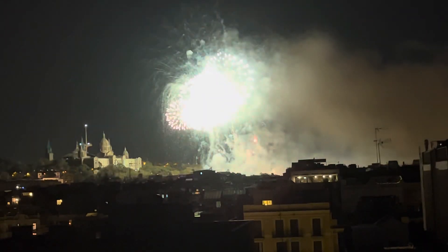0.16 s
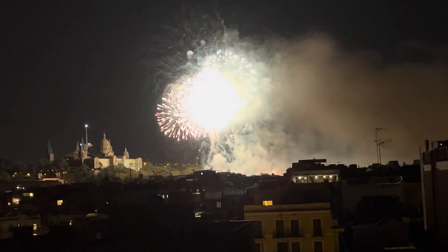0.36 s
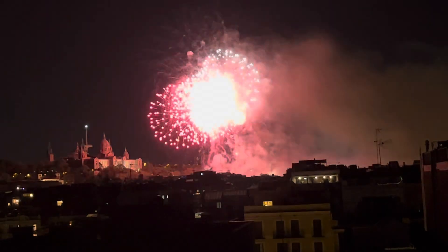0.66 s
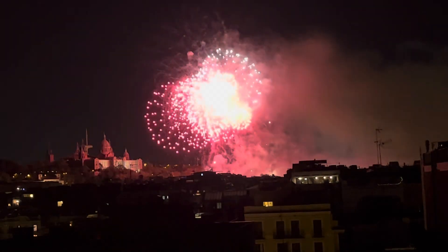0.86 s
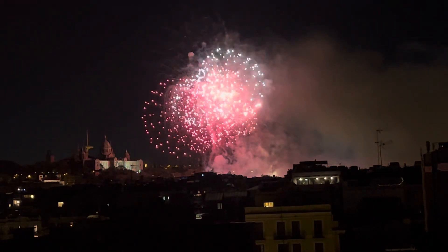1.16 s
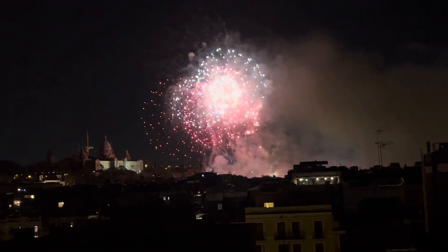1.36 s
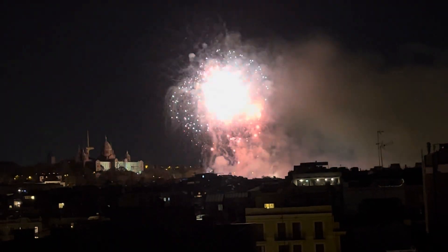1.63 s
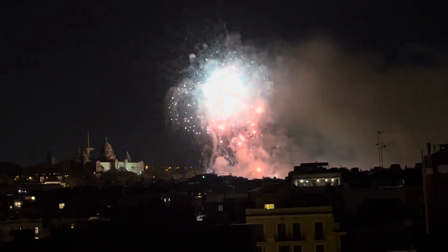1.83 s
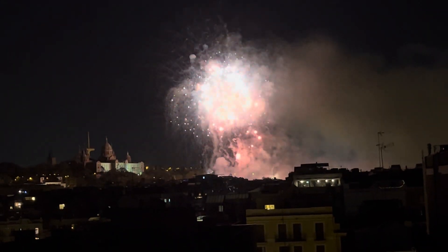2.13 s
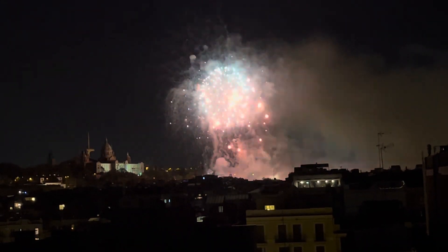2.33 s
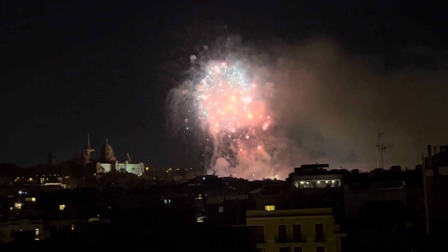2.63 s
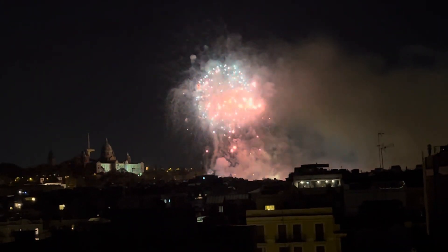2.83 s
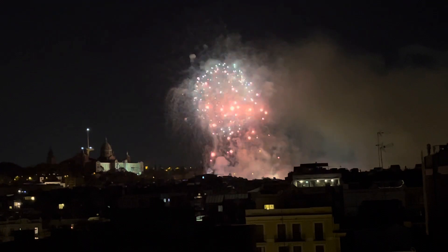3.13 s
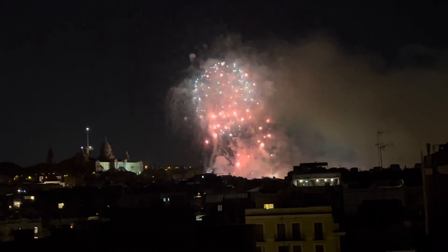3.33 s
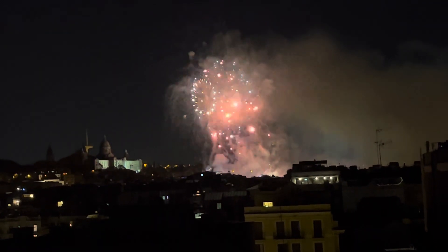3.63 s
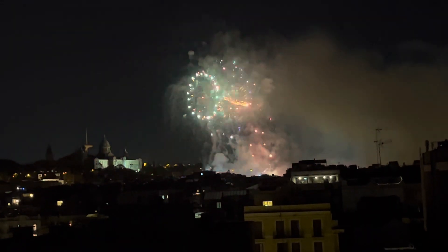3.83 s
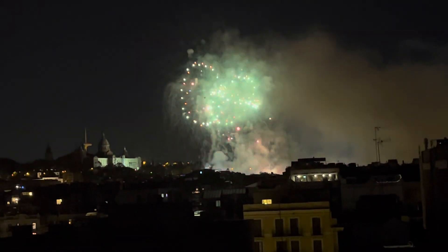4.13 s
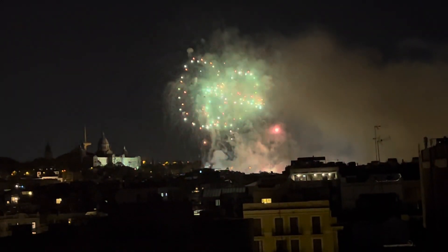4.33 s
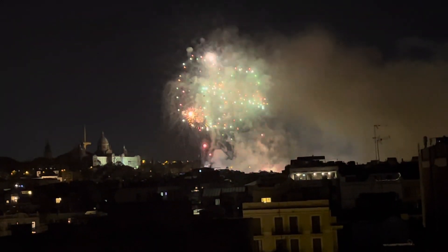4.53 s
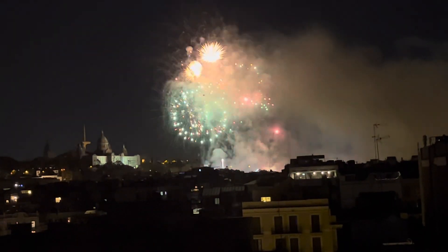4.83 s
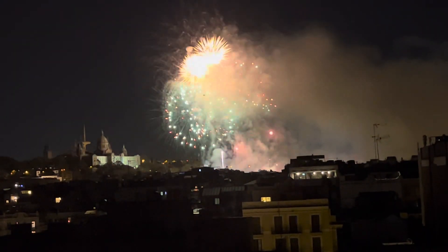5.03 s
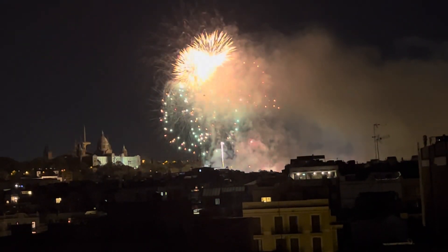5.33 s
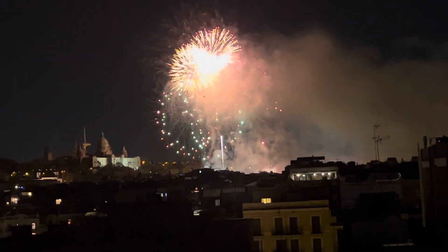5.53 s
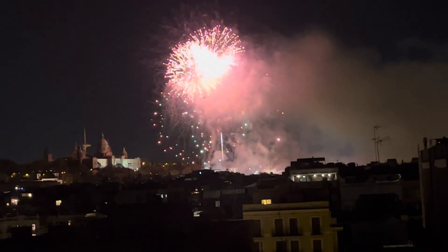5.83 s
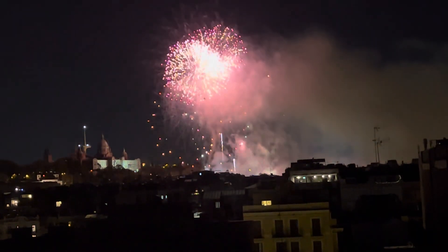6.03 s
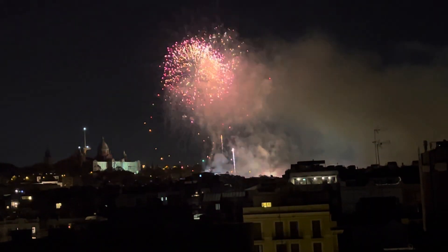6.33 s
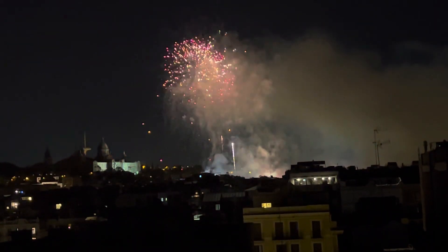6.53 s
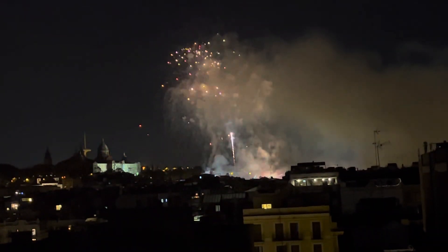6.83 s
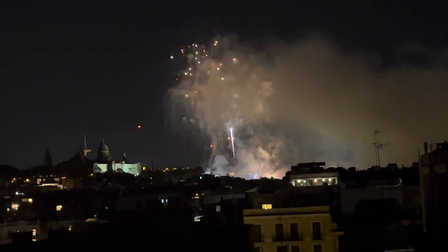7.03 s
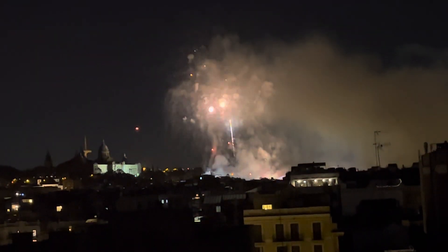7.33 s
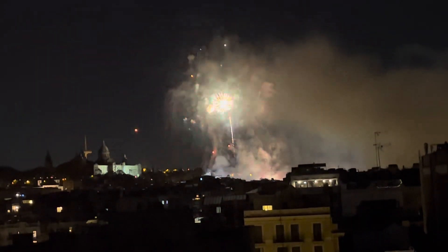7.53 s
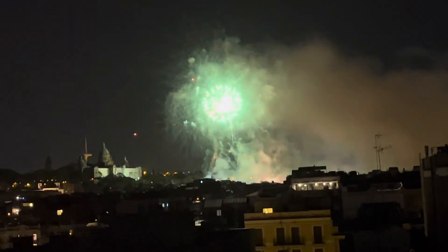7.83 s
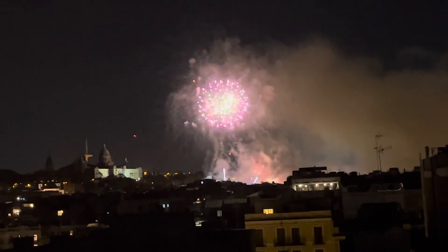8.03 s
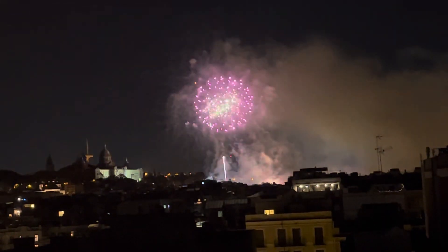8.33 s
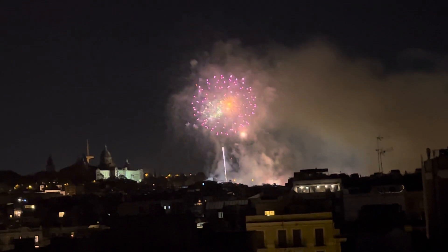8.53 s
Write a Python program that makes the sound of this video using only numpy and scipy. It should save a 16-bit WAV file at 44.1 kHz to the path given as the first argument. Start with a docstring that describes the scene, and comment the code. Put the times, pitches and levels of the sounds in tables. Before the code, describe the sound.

Far-off aerial fireworks bang sharply in clusters, echoes rumbling off hills and buildings, quiet gaps between volleys above a humming city.

```python
"""Night fireworks far off over a humming city, heard from a rooftop by a phone with two ports.
At first a volley to 1.3 s, amid the echoes of a shell that burst just before; a launch thump at 2.3 s.
Volleys at 2.8-4.9 s, thumps mainly at 6.7-7.1 s, a last volley at 7.3-8.6 s; rumble rolls throughout.
Bursts and thumps are short blast waves; their echoes are noise shaped by hills and blocks of houses.
The phone's low cut and band-splitting filters smear each blast into a falling chirp; a limiter acts."""
import sys
import numpy as np
from scipy import signal
from scipy.fft import rfft, irfft, next_fast_len
from scipy.io import wavfile
from scipy.ndimage import uniform_filter1d, minimum_filter1d

SR = 44100
rng = np.random.default_rng(int(sys.argv[2]) if len(sys.argv) > 2 else 0)


def to_wav(sig):
    """Store sig (one row per channel, or 1-D mono) as 16-bit WAV at the path in sys.argv[1].

    Samples outside -1..1 are clipped; the rate is SR.
    """
    pcm = np.clip(np.atleast_2d(sig), -1, 1) * 32767
    pcm = np.round(pcm).astype(np.int16)
    wavfile.write(sys.argv[1], SR, pcm.T)  # frames by channels


N = 381906  # samples

# shell bursts: t/s, level before air loss/dB, blast length/ms, air loss at 4 kHz/dB, echo level/dB
BURSTS = [(-0.2, 5, 1.5, 11, -22.5), (0.1145, 11, 1.3, 10.5, -30.5), (0.534, 6, 1.12, 9.5, -36),
          (0.6261, 5.5, 1.1, 8.5, -44.5), (0.6557, 4.5, 1.4, 14, -31), (1.074, 6, 1.8, 7, -26.5),
          (1.2139, 4.5, 2.9, 5.5, -22), (1.2612, 4.5, 1.7, 11.5, -29), (2.808, 9, 0.77, 18.5, -26),
          (2.9687, 5, 1.95, 9.5, -27.5), (3.9228, 10.5, 0.97, 14, -23.5), (3.9409, 5, 2.3, 6, -30),
          (3.9470, 4.5, 1.6, 7, -24.5), (4.0571, 1.5, 3, 11.5, -27.5), (4.3026, 6.5, 1, 9, -20.5),
          (4.313, 0.5, 2.2, 4.5, -31.5), (4.5697, 3, 1.4, 13.5, -30.5), (4.8533, 3.5, 1.4, 14, -40),
          (7.2633, 6.5, 2.5, 2, -17.5), (7.6831, 13.5, 1.5, 5.5, -28.5), (7.7207, 4, 2.8, 4, -23.5),
          (8.5478, 6.5, 1.1, 5.5, -23), (8.5583, -0.5, 0.91, 2.5, -40), (8.5654, -3.4, 2.2, 3, -21.5)]


def gain_of(db):
    """Amplitude factor of a level in dB."""
    return 10 ** (np.asarray(db) / 20)


def evened(x):
    """Scales to rms 1."""
    return x / np.sqrt(np.mean(x ** 2) + 1e-20)


def read(points, hz, axis=1):
    """Interpolates a table column over log frequency."""
    columns = np.transpose(points)
    return np.interp(np.log(hz + 1), np.log(columns[0] + 1), columns[axis])


def add(mix, start_s, sound):
    """Mixes in a two-channel sound, cut at the end of the mix."""
    part = mix[:, round(start_s * SR):][:, :sound.shape[1]]
    part += sound[:, :part.shape[1]]


def diffuse(colour, motion, size, patchy_db):
    """Two-port noise: fixed colour, short-time magnitude motion(hz, t) in random patches."""
    # diffuse sound at the two ports: f/Hz, left-right likeness/0-1
    port_likeness = [(60, 1), (110, 0.99), (220, 0.99), (420, 0.57), (810, 0.82), (1550, 0.26), (2970, 1),
                     (5690, 0.92)]
    hop = size // 4
    frames = N // hop + 5
    hz = np.fft.rfftfreq(size, 1 / SR)
    t = np.arange(frames) * hop / SR
    a, b, c, d, patches = rng.standard_normal((frames, len(hz), 5)).T
    patches = uniform_filter1d(patches, size=9, axis=0)  # over frequency
    patches = evened(uniform_filter1d(patches, size=7, axis=1))  # over time
    noise = np.array([a + 1j * b, c + 1j * d])
    frames_out = noise * motion(hz, t) * gain_of(patchy_db * patches)
    waves = signal.istft(frames_out, nperseg=size, noverlap=size - hop)[1][:, :N]
    mid, side = rfft(waves)
    hz = np.fft.rfftfreq(N, 1 / SR)
    likeness = np.clip(read(port_likeness, hz), 0, 1)
    mid = mid * np.sqrt((1 + likeness) / 2)
    side = side * np.sqrt((1 - likeness) / 2)
    return irfft(gain_of(read(colour, hz)) * [mid + side, mid - side], N)


def city():
    """Far traffic and air handling: steady coloured noise."""
    # hum of the night city: f/Hz, relative spectral level/dB
    hum_colour = [(25, 18.5), (38, 15), (55, 0), (100, -17), (170, -3), (320, -13), (400, -27.5),
                  (950, -18.5), (1250, -33), (1600, -38.5), (3000, -51.5), (6000, -75), (12000, -71.5)]
    hum_rms_db = -31
    hum = diffuse(hum_colour, lambda hz, t: 1, size=2048, patchy_db=1.0)
    return gain_of(hum_rms_db) * evened(hum)


def every_blast():
    """Bursts and mortar launches, a launch being a dull, short blast; columns as in BURSTS."""
    # launch mortars: t/s, level before air loss/dB
    launches = [(2.327, -9.5), (3.85, -18), (6.667, -20), (6.764, -18.5), (6.851, -13.5), (6.871, -16.5),
                (6.896, -10.5), (6.92, -22), (6.935, -22.5), (7.097, -17.5)]
    length_ms, air_loss_db = 0.63, 38.5
    echo_re_level_db = -31
    return BURSTS + [(s, db, length_ms, air_loss_db, db + echo_re_level_db) for s, db in launches]


def answer(age_s):
    """Power returned at a given age of one blast: each reflector swells in, then decays exponentially."""
    # roofs nearby, blocks of houses, first and second hillside, far city:
    # delay/s, swell/s, level/dB, t60/s
    reflectors = [(0, .008, 17, 0.12), (.02, 0.12, -2, 4.2), (0.231, 0.0094, 7.5, 0.34),
                  (.338, 0.017, 6.5, 0.38), (.5, 0.22, -16.5, 3.8)]
    power = 0
    for delay_s, swell_s, db, t60_s in reflectors:
        since_s = np.maximum(age_s - delay_s, 0)
        swell = np.minimum(since_s / swell_s, 1) ** 2
        power = power + swell * gain_of(db - 60 * since_s / t60_s) ** 2
    return power


def echoes():
    """Rolling rumble: powers of all returns add up in uneven lumps, bass fading faster than treble."""
    # colour of the echoes: f/Hz, relative spectral level/dB, extra loss with age/(dB/s), < 0 is a gain
    echo_colour = [(25, 11, 5), (43.7, 7.5, 4), (75.4, -8.5, 6), (100, -11, 4.5), (204, -12, -2),
                   (355, -20, -2), (444, -21.5, -8.5), (980, -25.5, -6), (1194, -33, -4),
                   (1630, -26.5, -7.5), (1700, -31.5, -5.5), (3120, -41, -4), (4860, -54, -3.5),
                   (12000, -78, -1)]
    # rumble of earlier and farther shells: t/s, level/dB
    far_rumble = [(0, -19.5), (.8, -24), (1.6, -19.5), (2.4, -31), (4, -32.5), (5, -27.5), (5.8, -43),
                  (6.4, -43.5), (7.1, -36.5), (7.9, -22), (8.66, -24.5)]
    lumpy_share = .35  # 0-1
    echo_s = 3

    def motion(hz, t):
        power = np.zeros((len(hz), len(t)))
        lumps = np.minimum(rng.exponential(1, len(t)), 4) ** 2 / 2  # shared by all bands
        unevenness = 1 - lumpy_share + lumpy_share * lumps
        for s, _, _, air_loss_db, echo_db in every_blast():
            heard = (t > s) & (t < s + echo_s)
            age_s = t[heard] - s
            age_loss_db = np.outer(read(echo_colour, hz, axis=2), age_s)
            treble_loss_db = 0.31 * air_loss_db * hz[:, None] / (hz[:, None] + 3000)
            level = gain_of(echo_db - age_loss_db - treble_loss_db)
            power[:, heard] += level ** 2 * answer(age_s) * unevenness[heard]
        power += gain_of(np.interp(t, *np.transpose(far_rumble))) ** 2
        surges = evened(uniform_filter1d(rng.standard_normal(len(t)), size=24))
        rolling = gain_of(1.6 * np.outer(400 / (hz + 400), surges))  # mostly in the bass
        return rolling * np.sqrt(power)

    return diffuse(echo_colour, motion, size=256, patchy_db=1.0)


def blast(level_db, length_ms, air_loss_db, scatter, lead):
    """Pressure jump sagging through zero, dulled by air, scattered by near walls; starts after lead samples."""
    # rooftop reflections: delay/s, level/dB
    near_walls = [(.0022, -12), (.0066, -19)]
    # what nearby walls send unequally to the two ports: f/Hz, level/dB
    unequal_scatter = [(60, -42.5), (110, -40.5), (190, -38), (330, -22.5), (580, -0.5), (1030, -7.5),
                       (1820, -3), (3220, -19.5), (5690, -4.5)]
    size = 4096
    hz = np.fft.rfftfreq(size, 1 / SR)
    t = np.arange(size) / SR
    u = t / (max(length_ms, .1) / 1000)
    jump = (1 - u) * np.exp(-u)
    # four one-pole low-passes, together air_loss_db down at 4 kHz
    air = 1 / (1 + 1j * hz / 4000 * np.sqrt(gain_of(max(air_loss_db, .1) / 2) - 1)) ** 4
    wave = rfft(np.roll(jump, lead)) * air
    fade = np.exp(-t / .003) + .12 * np.exp(-t / .02)  # close clutter, then the roofs around
    clutter = rfft(scatter * fade / np.linalg.norm(fade))
    walls = sum(gain_of(db) * np.exp(-2j * np.pi * hz * s) for s, db in near_walls)
    treble = 1 / (1 + (450 / (hz + 1)) ** 2)  # small surfaces and the phone's body act only on short waves
    rough = gain_of(-3) * clutter[0] / (1 + (hz / 4000) ** 2)
    mid = wave * (1 + treble * (walls + rough))
    side = wave * clutter[1] * gain_of(read(unequal_scatter, hz))
    return gain_of(level_db) * irfft([mid + side, mid - side])


def blasts():
    """Direct bursts and launches, plus slaps: each burst sent back by small surfaces and single large walls."""
    # walls, and earlier small surfaces giving short bright ticks: delay/s, level re the burst's echo level/dB,
    # blast length/ms
    slap_walls = [(0.04, -4, 0.13), (.076, -2.5, 0.13), (.13, -6.5, 0.19), (.238, -3.5, 0.43),
                  (.357, -3.5, 0.46)]
    slap_air_loss_db = 5
    spread_s, spread_db = 0.0025, 1  # standard deviations; shells burst at slightly different places
    lead = 256  # silent samples ahead of each blast
    rows = [row[:4] for row in every_blast()]
    chance = rng.standard_normal((len(BURSTS), len(slap_walls), 2))
    for (s, _, _, _, echo_db), draws in zip(BURSTS, chance):
        for (delay_s, db, length_ms), (late, loud) in zip(slap_walls, draws):
            slap_s = s + delay_s + spread_s * late
            slap_db = echo_db + db + spread_db * loud
            rows.append((slap_s, slap_db, length_ms, slap_air_loss_db))
    mix = np.zeros((2, N))
    scatters = rng.standard_normal((len(rows), 2, 4096))
    for (s, *row), scatter in zip(rows, scatters):
        if s > lead / SR:  # earlier ones are left out
            add(mix, s - lead / SR, blast(*row, scatter, lead))
    return mix


def scene():
    """City, echoes and direct blasts."""
    return city() + echoes() + blasts()


def record(dry):
    """Microphone colour, low cut, rings and crossovers, then peak limiter and band limit."""
    # microphone and ports: f/Hz, level/dB
    microphone = [(130, 1), (330, 3), (560, -3), (900, -3.5), (1400, -0.5), (2000, -3), (2600, -3),
                  (5000, -1.5), (6200, -7), (6900, -14), (7500, -7), (11000, -10.5), (12500, -32.5),
                  (16000, -32.5)]
    # low boom of the rooftop, a low-mid ring, the phone's body, the cavity behind its port: # f/Hz, width/Hz,
    # level/dB
    rings = [(106.1, 13, -9), (381.4, 24, -6.5), (1942, 130, -1.5), (9640, 50, 11.5)]
    # all-pass stages left by band splitting: f/Hz, Q
    crossovers = [(193, .5), (1019, .16)]
    # how the phone's body favours one port: f/Hz, left minus right/dB
    leaning = [(60, -0.5), (130, 0.0), (270, -1.5), (580, 3), (1250, 1.5), (2660, -1), (5690, 0.5)]
    low_cut_hz, low_cut_q = 89, 1.54
    edge_hz, ceiling = 16300, .95
    size = next_fast_len(N + SR // 2)
    hz = np.fft.rfftfreq(size, 1 / SR)
    s = 1j * hz
    low_cut = s * s / (s * s + s * low_cut_hz / low_cut_q + low_cut_hz ** 2)
    chain = -gain_of(read(microphone, hz)) * low_cut ** 2  # polarity inverted
    for f, width_hz, ring_db in rings:
        chain *= 1 + gain_of(ring_db) / (1 + 2j * (hz - f) / width_hz)
    for f, q in crossovers:  # each delays the bass more than the treble
        all_pass = (s * s - s * f / q + f * f) / (s * s + s * f / q + f * f)
        chain *= all_pass ** 2
    chain = chain * gain_of(np.outer([.5, -.5], read(leaning, hz)))
    x = irfft(rfft(dry, size) * chain, size)[:, :N]
    room_left = np.minimum(ceiling / (abs(x).max(0) + 1e-9), 1)  # shared by both channels
    x = x * uniform_filter1d(minimum_filter1d(room_left, size=201), size=201)
    band_limit = signal.firwin(511, edge_hz, window=("kaiser", 9), fs=SR)
    return signal.oaconvolve(x, band_limit[None], "same")


dry = scene()
out = record(dry)
to_wav(out)
```